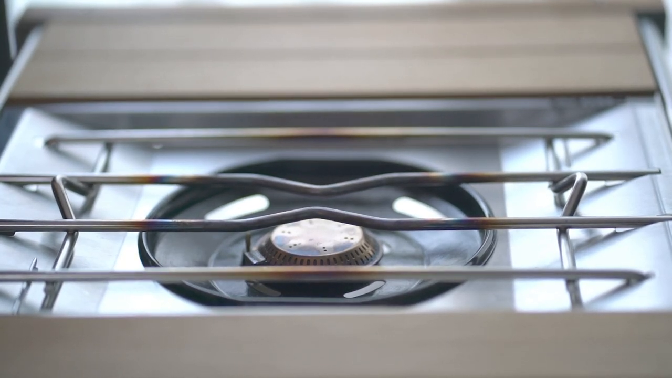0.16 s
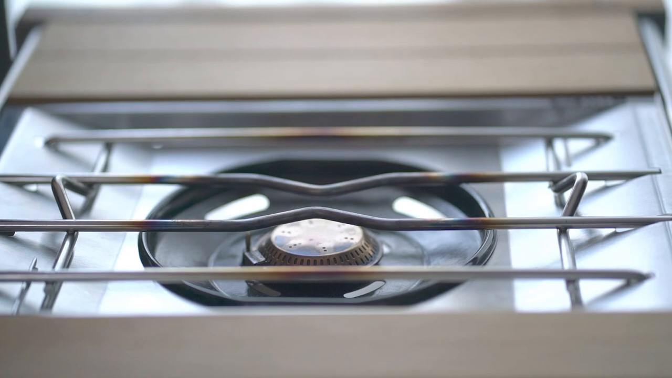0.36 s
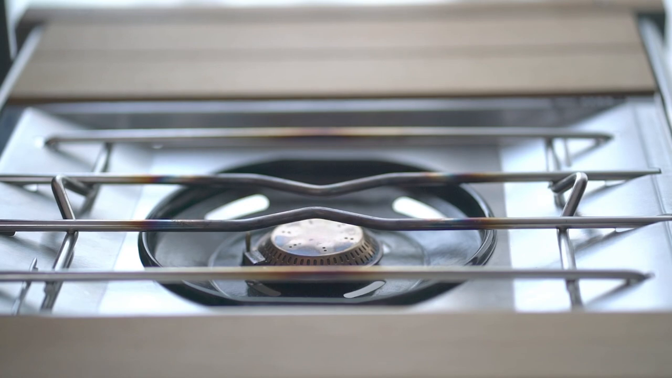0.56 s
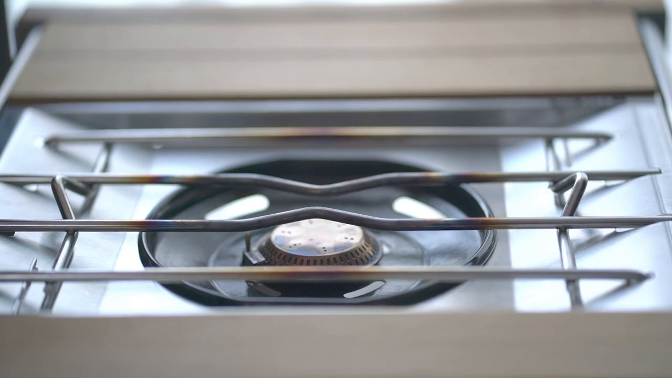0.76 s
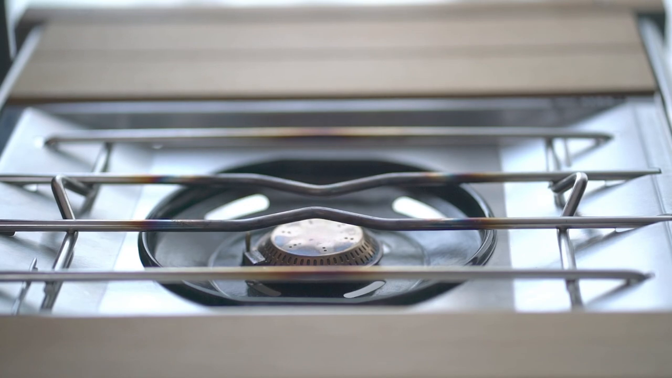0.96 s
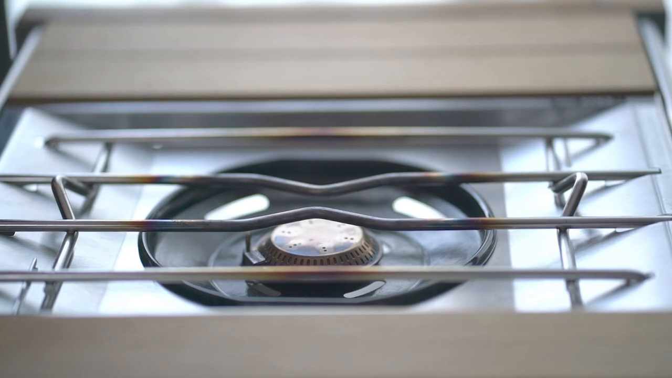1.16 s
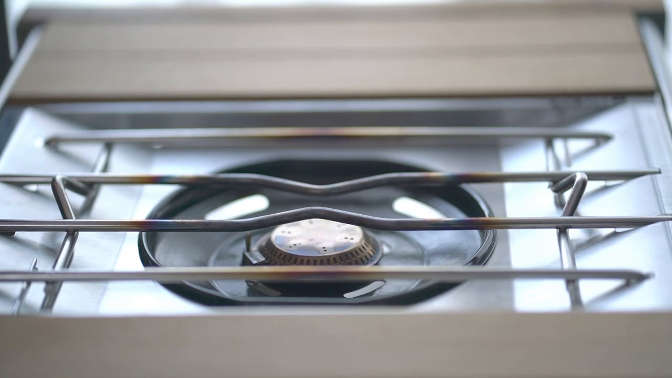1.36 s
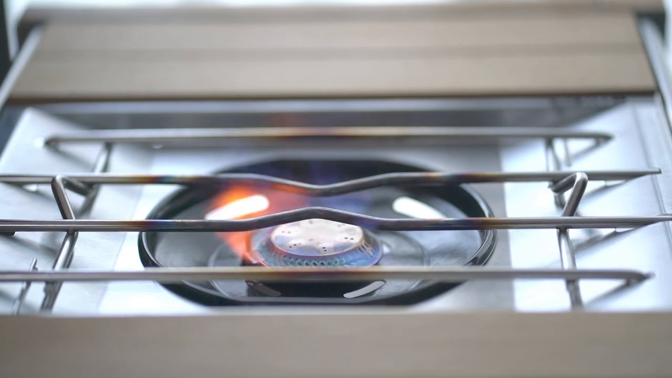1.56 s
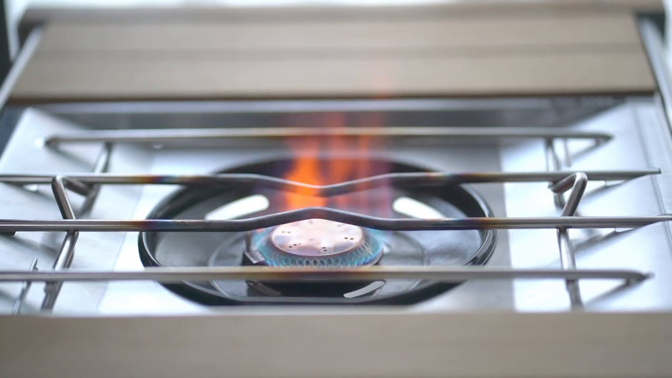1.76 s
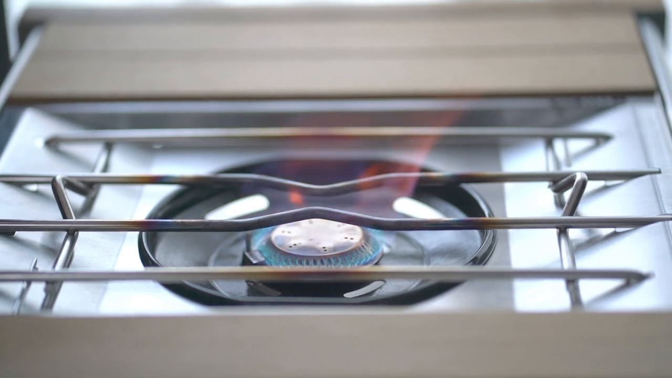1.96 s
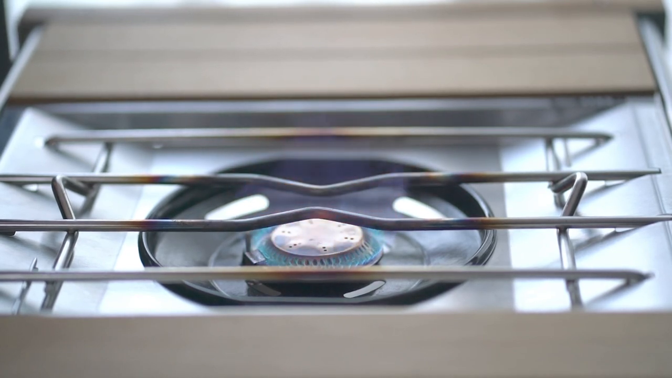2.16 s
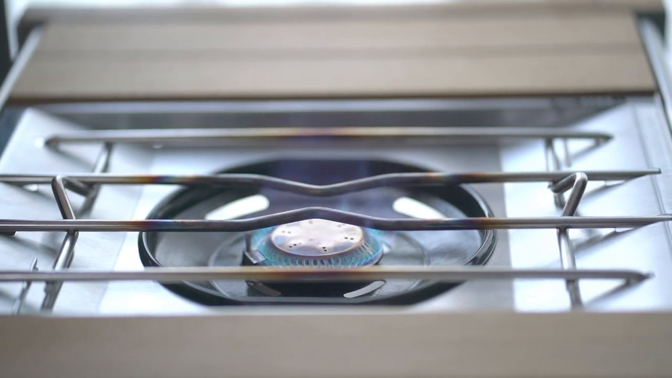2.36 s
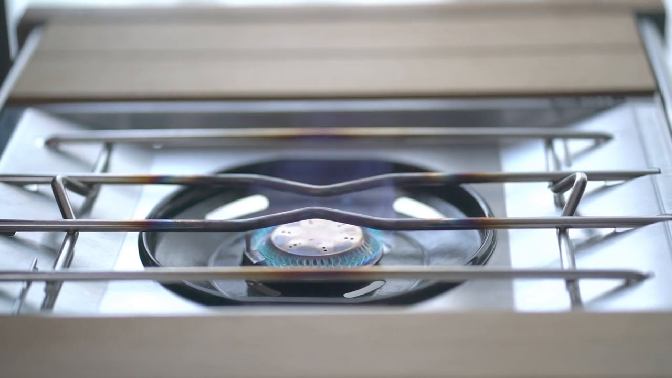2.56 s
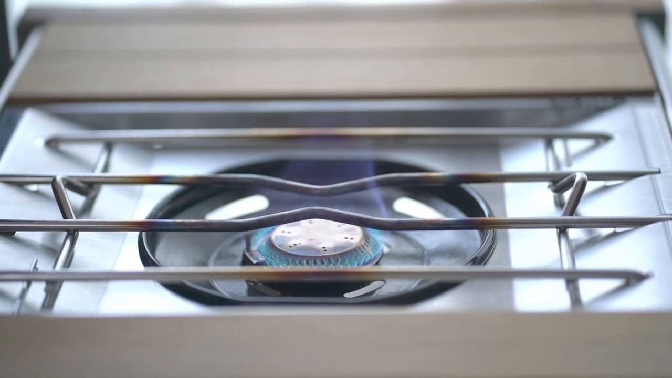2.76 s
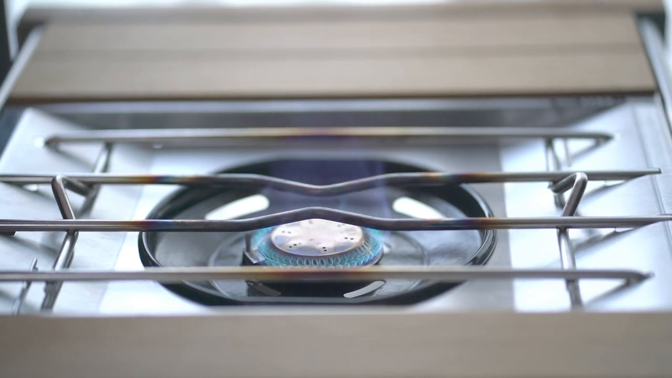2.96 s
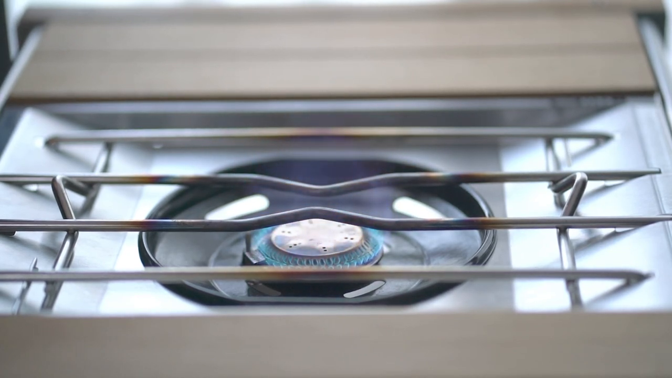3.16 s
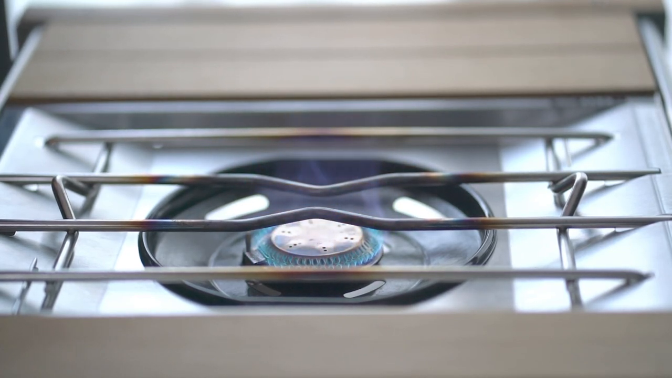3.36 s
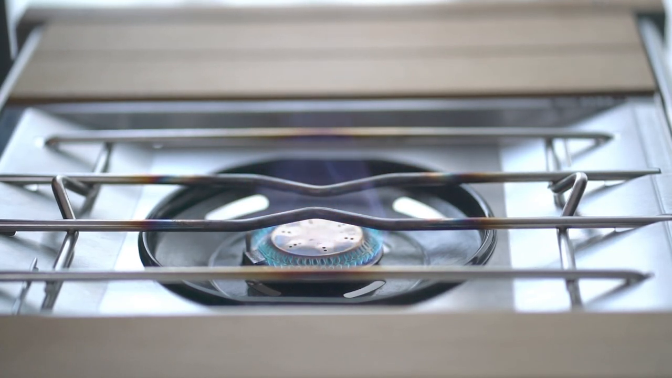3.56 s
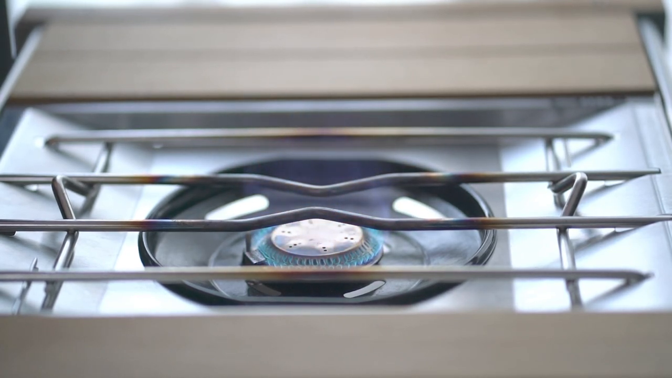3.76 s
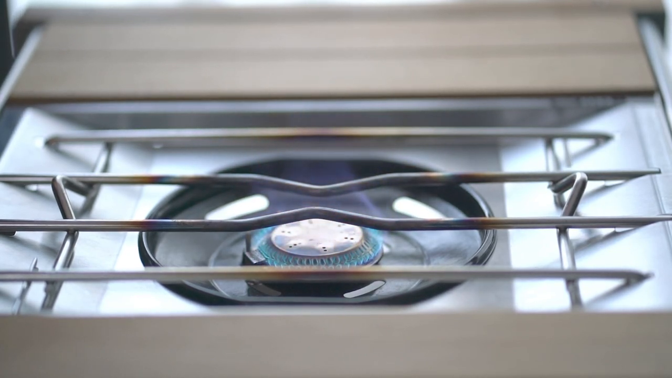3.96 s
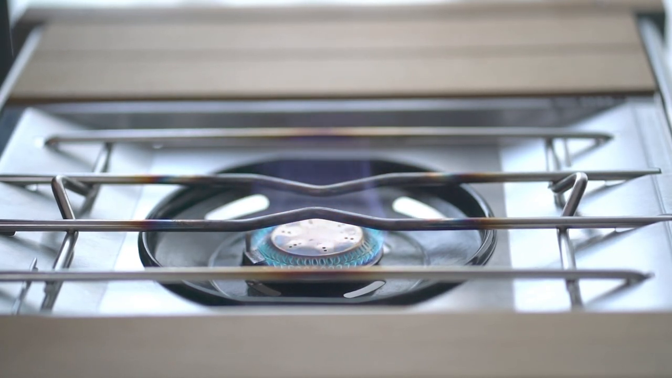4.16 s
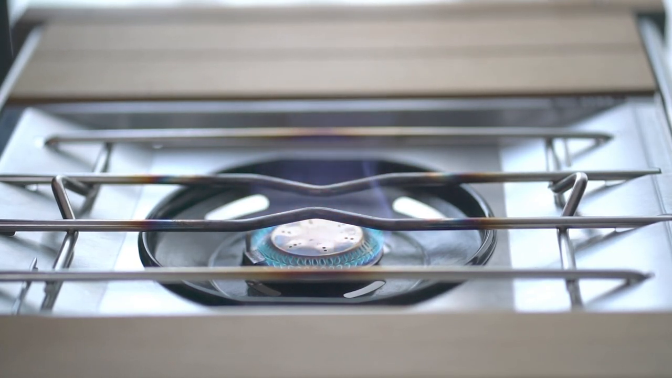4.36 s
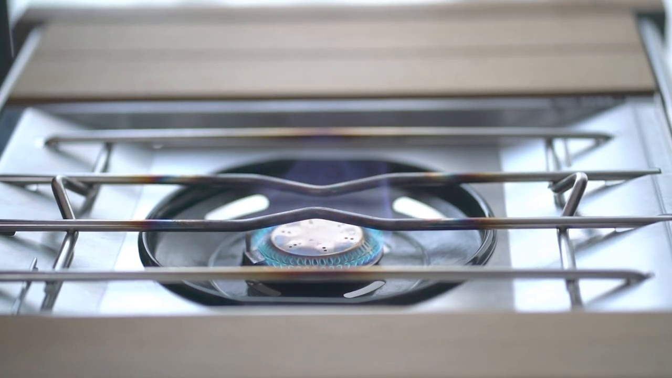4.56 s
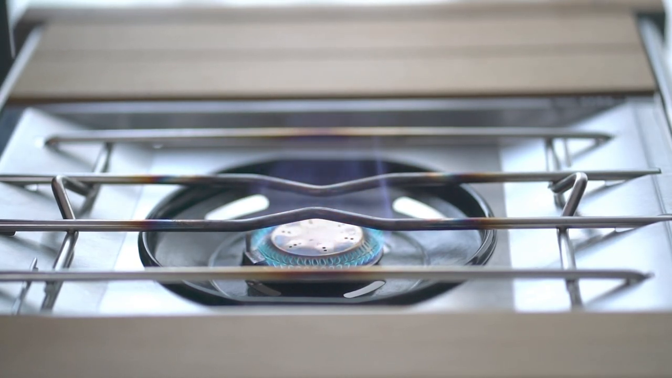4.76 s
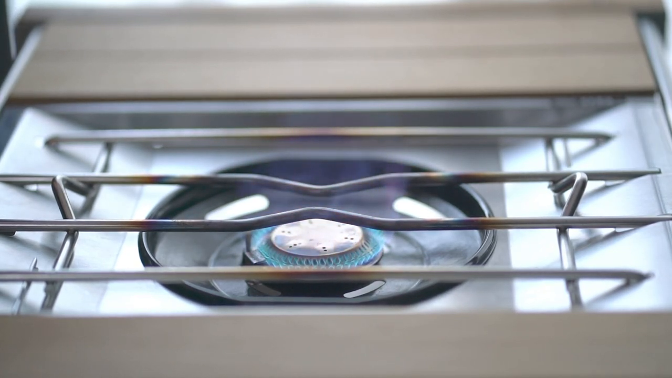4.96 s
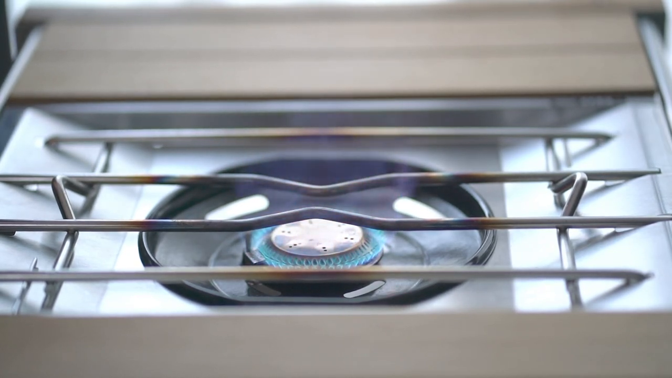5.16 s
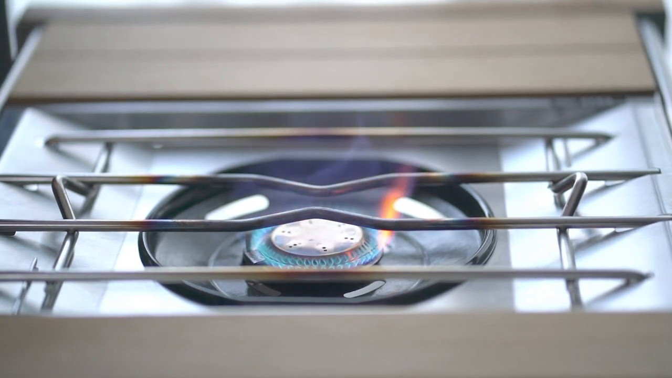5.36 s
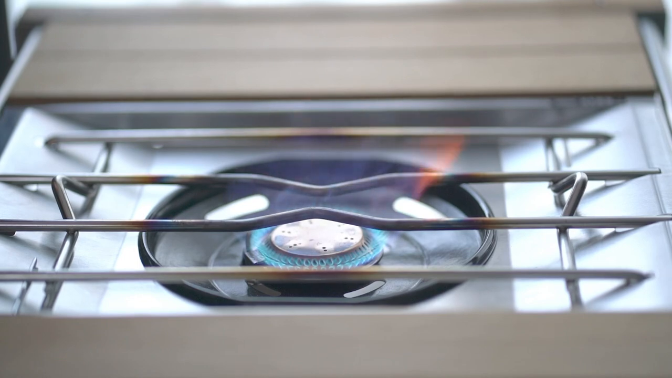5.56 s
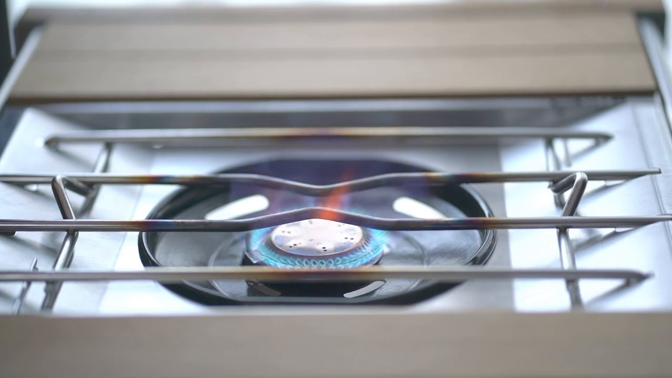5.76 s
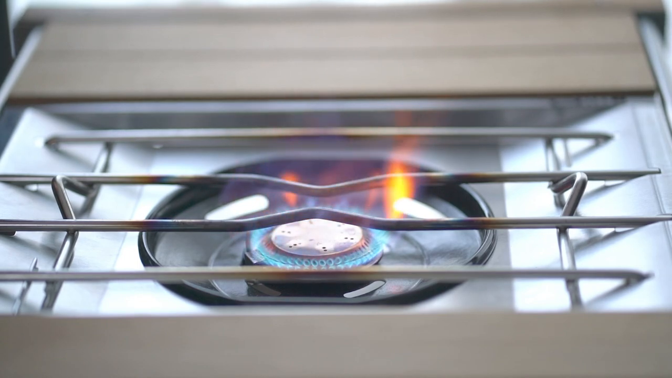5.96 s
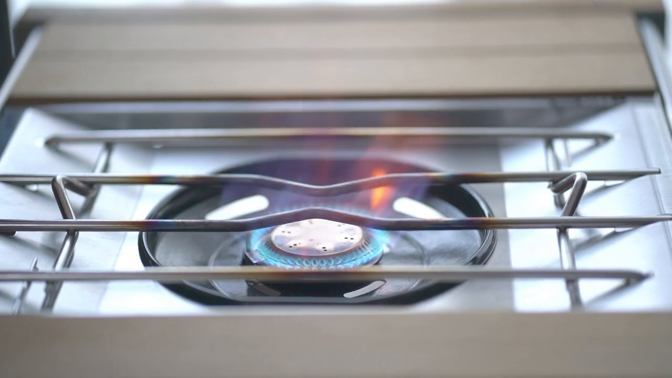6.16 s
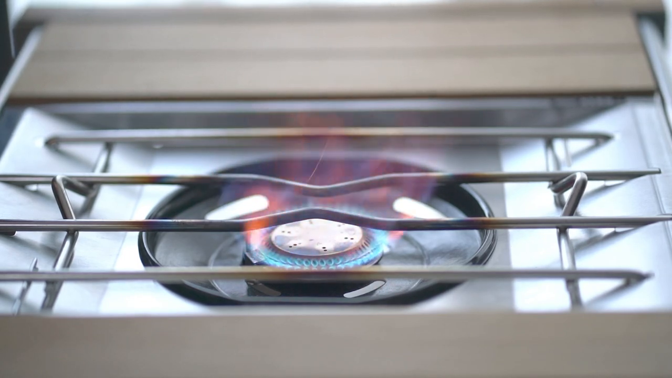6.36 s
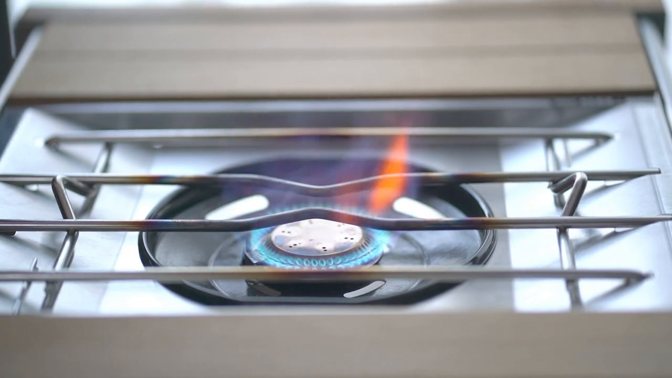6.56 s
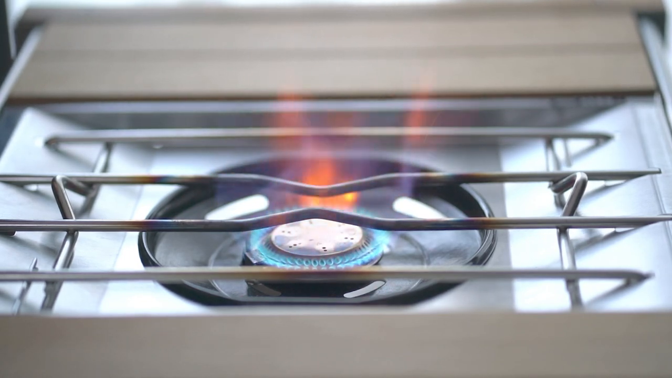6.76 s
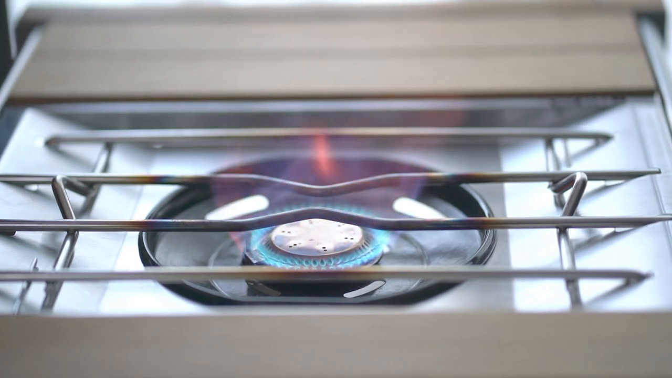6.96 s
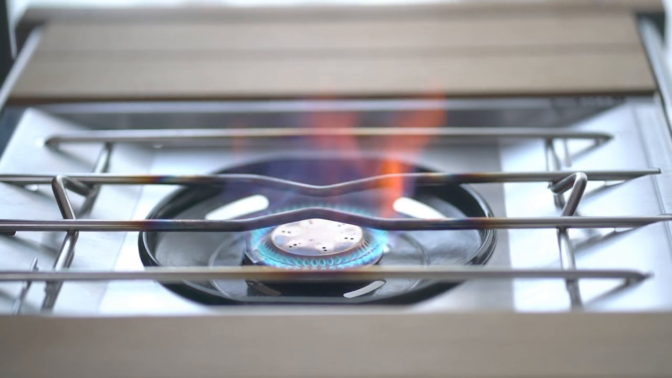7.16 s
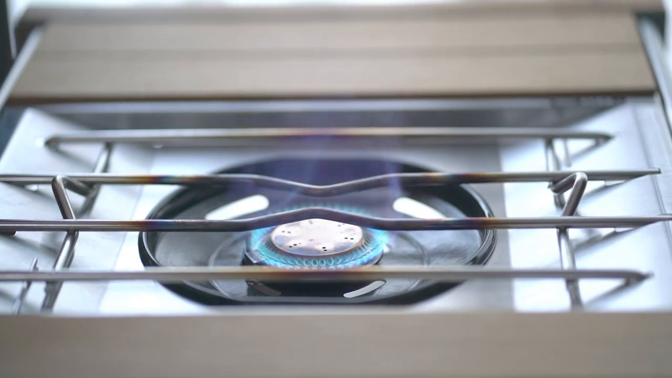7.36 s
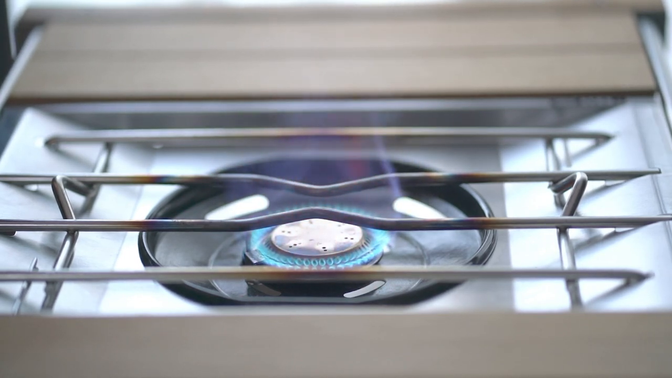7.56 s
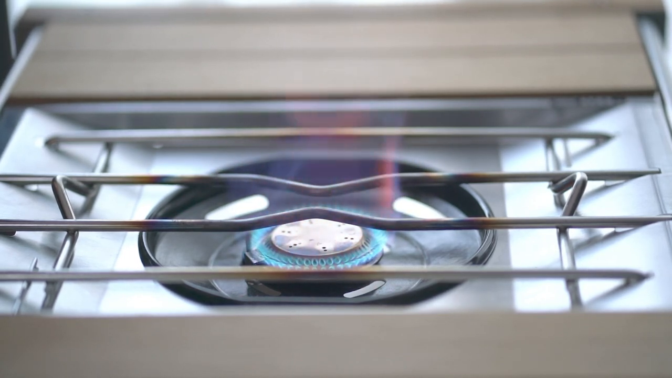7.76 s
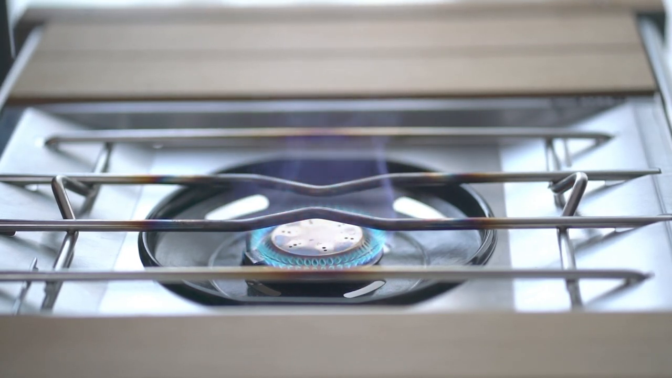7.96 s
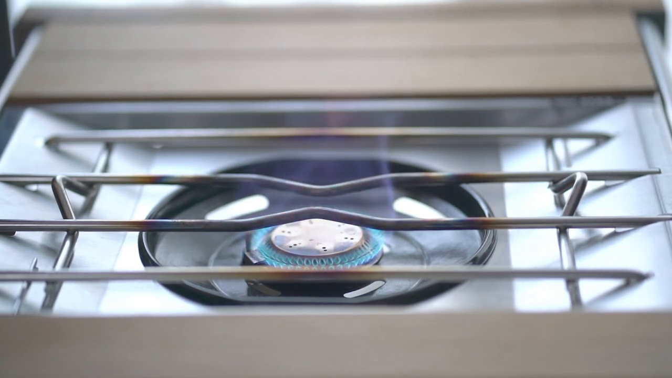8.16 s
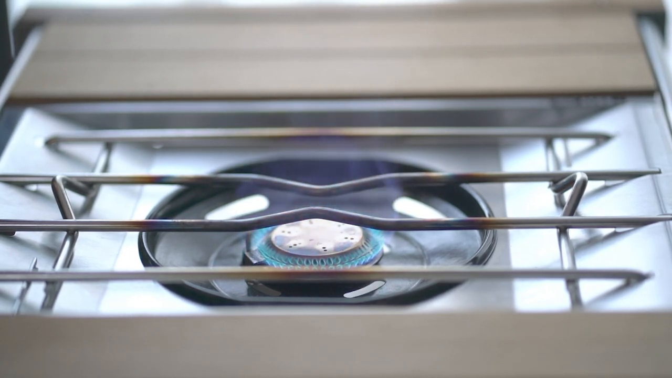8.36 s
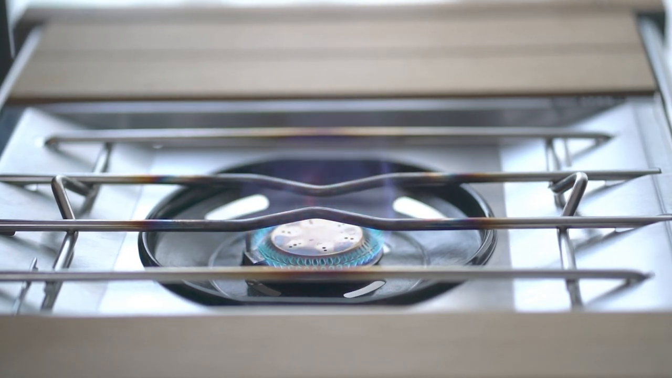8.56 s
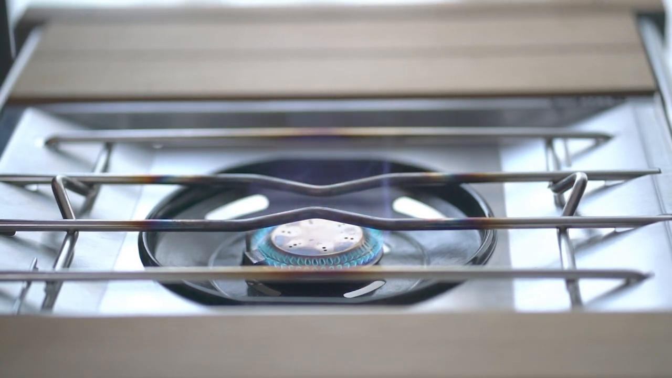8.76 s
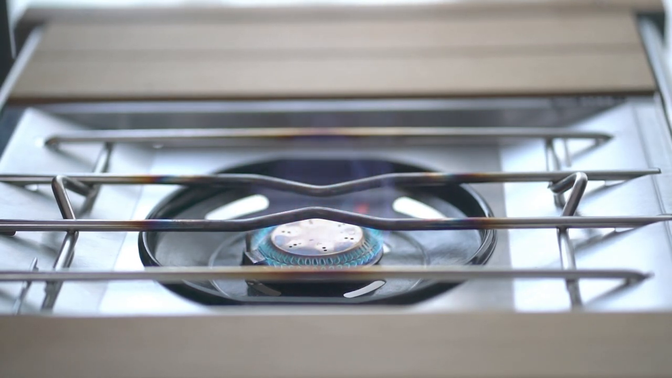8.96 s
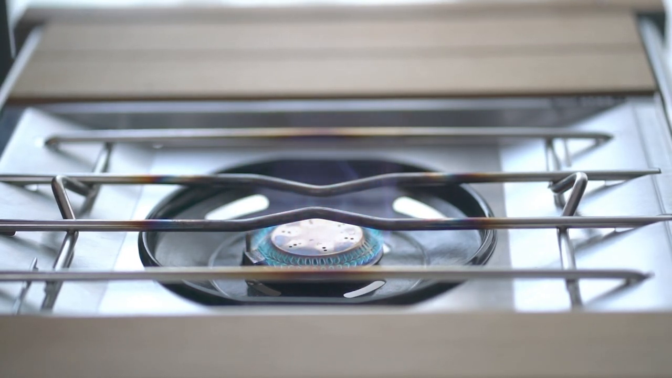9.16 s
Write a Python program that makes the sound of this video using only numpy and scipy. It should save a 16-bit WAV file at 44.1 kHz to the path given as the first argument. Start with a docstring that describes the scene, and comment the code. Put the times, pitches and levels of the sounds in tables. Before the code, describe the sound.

A gas camping stove hisses, its igniter snaps and clacks, and the flame catches, swelling to a soft roar before easing off outdoors.

```python
"""A camping gas stove burns close by, outdoors. As the valve opens, the turbulent jet hisses and excites
the resonances of the mixing tube, one group of them as a whistle. The piezo igniter snaps and springs
back, setting the steel case ringing. The flame catches with a puff, is turned down, up to a soft roar
and down again, over a steady far rush and a few faint bird calls."""
import sys
import numpy as np
from scipy import signal
from scipy.fft import rfft, irfft, next_fast_len
from scipy.io import wavfile
from scipy.ndimage import map_coordinates

SR = 44100
rng = np.random.default_rng(int(sys.argv[2]) if len(sys.argv) > 2 else 0)


def to_wav(s):
    """Save 16-bit WAV."""
    ch = np.atleast_2d(s).T  # columns
    pcm = np.round(np.clip(ch, -1, 1) * 32767)  # PCM
    wavfile.write(sys.argv[1], SR, pcm.astype(np.int16))


N = 406602


def amp(db):
    """Amplitude ratio of a level in decibels."""
    return 10 ** (np.asarray(db) / 20)

def unit(x):
    """Normalisation to rms 1."""
    return x / np.sqrt(np.mean(x ** 2) + 1e-20)

def along(points, hz):
    """Interpolation of (f/Hz, value) points on a logarithmic frequency axis."""
    f, v = np.transpose(points)
    return np.interp(np.log(hz + 1), np.log(f + 1), v)

def wobble(rate):
    """Smooth random modulation: a spline through `rate` Gaussian knots a second."""
    knots = rng.standard_normal(int(N * rate / SR) + 4)
    return map_coordinates(knots, [np.arange(N) * rate / SR])

def since(onset_s):
    """Time in seconds since an onset, zero before it."""
    return np.maximum(np.arange(N) / SR - onset_s, 0)

def filtered(x, response):
    """Linear filtering: the spectrum of x is multiplied by a frequency response."""
    size = x.shape[-1]
    padded = next_fast_len(size + 8192)
    return irfft(rfft(x, padded) * response(np.fft.rfftfreq(padded, 1 / SR)), padded)[..., :size]

def stereo(mid, side):
    """Sum and difference: left and right from mid and side."""
    return np.array([mid + side, mid - side])

def rush(spectrum, width, size=N):
    """Shaped stereo noise of rms 1, given its relative spectrum and its side level against mid."""
    colour = lambda hz: amp(along(spectrum, hz)) * np.array([np.ones_like(hz), amp(along(width, hz))])
    return unit(stereo(*filtered(rng.standard_normal((2, size)), colour)))

def diffuse_echoes(size, t60):
    """Impulse response of a diffuse field: two channels of decaying noise, each of unit energy."""
    t = np.arange(size) / SR
    echoes = rng.standard_normal((2, size)) * amp(-60 * t / t60)
    return echoes / np.linalg.norm(echoes, axis=1, keepdims=True)


# gas flow as the valve is turned: t/s, level/dB
VALVE_FLOW = [(0.0, -71.5), (0.54, -61), (0.77, -57), (1.43, -50.5), (2.67, -52), (3.18, -56), (3.7, -58),
              (4.19, -55), (4.41, -53), (4.75, -51), (5.06, -48), (6.09, -41.5), (6.65, -40), (7.65, -42.5),
              (7.96, -46), (8.32, -47), (8.7, -53), (9.22, -57.5)]
WIDE_OPEN_DB = -40.5

def flow():
    """Throttling: the valve sets the gas flow, in dB relative to wide open."""
    times, level_db = np.transpose(VALVE_FLOW)
    return np.interp(np.arange(N) / SR, times, level_db) - WIDE_OPEN_DB

def tray(x):
    """Interference: reflections between steel tray and lid comb the sound, the treble least; rms 1."""
    reflection_db = [(2500, -5), (5500, -7), (9000, -9), (15000, -9)]
    echoes = filtered(diffuse_echoes(SR // 8, t60=0.22), lambda hz: amp(along(reflection_db, hz)))
    mid_side = stereo(*x)
    reflected = signal.fftconvolve(mid_side, echoes, axes=1)[:, :N]
    return unit(stereo(*(mid_side + reflected)))

def tube_ring(modes, flow_db, drift_db=1.5):
    """Forced resonance: turbulence drives each mode, which drifts and grows as a power of the flow."""
    ring, at_full_flow = np.zeros((2, 2, N))
    for centre_hz, width_hz, db, side_db, power in modes:
        band = lambda hz: 1 / (1 + 1j * (hz - centre_hz) / (0.48 * width_hz)) ** 2
        mid, side = filtered(rng.standard_normal((2, N)), band)
        mode = amp(db + drift_db * wobble(8)) * stereo(mid, amp(side_db) * side)
        at_full_flow += mode
        ring += amp(flow_db) ** power * mode
    return tray(ring) * ring.std() / at_full_flow.std()


# modes of mixing tube and burner head: f/Hz, bandwidth/Hz, relative level/dB, side/dB, flow exponent
TUBE_MODES = [(2062, 150, -11.5, -6, 1.1), (2333, 180, -4.5, -7, 1.01), (2465, 110, -2.7, -5, 0.75),
              (2549, 107, 3.2, -9, 1.26), (5160, 90, -1, -6, 0.71), (5296, 86, -3, 5, 0.92),
              (5437, 106, -3, 1.5, 0.69), (5583, 67, -1.5, -1, 0.77), (7680, 100, -2, -5, 1),
              (7873, 160, -0.1, -3, 0.86), (8100, 190, -2, 0, 0.91), (8203, 44, -1, -8, 1.15),
              (9600, 310, -10.5, 2, 1.1), (9630, 110, -5, -3, 1.25), (12900, 120, -15.2, -4, 0.86)]
# noise spectra of the jet and of the unlit ports: f/Hz, relative level/dB
JET_SPECTRUM = [(200, -30), (900, -6), (2000, -2), (3100, -2), (4200, 0.5), (5000, -0.5), (5800, 1),
                (6500, -6.5), (7200, -3), (8500, 0.5), (10000, 0), (11500, 0), (14000, -5.5), (15800, -4)]
PORT_SPECTRUM = [(1500, -17), (2700, -46), (3150, 8.5), (3600, 6), (4100, -54), (4700, -3), (6200, -10),
                 (7400, -3), (7830, 11.5), (8300, -15), (9400, 6.5), (11000, -32), (15800, -30)]
# stereo width of both: f/Hz, side level re mid/dB
JET_WIDTH = [(1000, -41), (2400, 3.5), (3100, -6.5), (4500, -4), (5500, -2), (6800, -7), (8500, -14),
             (10200, -3.5), (11000, -9.5), (13000, -4), (15500, -1)]
HISS_DB, RING_DB, PORT_DB = -35, -37, -37
LIGHT_S, PORT_FADE_DB_PER_S = 1.597, 90

def gas():
    """Turbulent jet noise: a broad hiss excites the tube; the ports hiss too until the gas is lit."""
    flow_db = flow()
    hiss = amp(HISS_DB + flow_db) * tray(rush(JET_SPECTRUM, JET_WIDTH))
    ring = amp(RING_DB) * tube_ring(TUBE_MODES, flow_db)
    ports = amp(PORT_DB + flow_db - PORT_FADE_DB_PER_S * since(LIGHT_S)) * rush(PORT_SPECTRUM, JET_WIDTH)
    sputter_db = 0.51 * wobble(14) + 0.44 * wobble(50)
    return amp(sputter_db) * (hiss + ring + whistle() + ports)


# modes of the whistle: f/Hz, bandwidth/Hz, relative level/dB, side/dB, flow exponent
WHISTLE_RESONANCES = [(3712, 103, -3.2, -3, 0.51), (3917, 110, 1.5, -12, 0.92), (4023, 170, -0.5, -21, 1)]
# its brief spurts: t/s, duration/s, level rise/dB
WHISTLE_SPURTS = [(4.92, .18, 6), (5.193, .16, 4), (7.42, .08, 6), (7.647, .08, 8), (7.83, .1, 2),
                  (8.043, 0.11, 5)]
WHISTLE_DB, KNEE_FLOW_DB = -51.5, -7.5

def whistle():
    """Saturating resonance: the whistle grows with the flow up to a knee, wavers and at times spurts."""
    t = np.arange(N) / SR
    spurt_db = sum(db * np.exp(-(2 * (t - s) / length) ** 2) for s, length, db in WHISTLE_SPURTS)
    drive_db = np.minimum(flow() - KNEE_FLOW_DB, 0)
    waver_db = 1.5 * wobble(11)
    return amp(WHISTLE_DB + waver_db + spurt_db) * tube_ring(WHISTLE_RESONANCES, drive_db)


# spectrum of the far rush: f/Hz, relative level/dB
AMBIENT_SPECTRUM = [(25, -47), (55, -39), (100, -30), (130, -16.5), (165, -22.5), (220, -8), (450, -7),
                    (800, -0.5), (1200, -4), (2000, -9.5), (4000, -15.5), (15000, -33)]
# stereo width of sound in the open air: f/Hz, side level re mid/dB
AIR_WIDTH = [(100, -34), (200, -36), (350, -18), (700, -12), (1400, -5.5), (3000, -3.5)]

def outdoors():
    """Ambient noise: a far, nearly stationary rush in the open air."""
    return amp(-50.5 + 0.12 * wobble(2.76)) * rush(AMBIENT_SPECTRUM, AIR_WIDTH)


# far bird calls: t/s, duration/s, start f/Hz, end f/Hz, level/dB
BIRD_CALLS = [(.2, 0.049, 1635, 1595, -56), (3.138, 0.044, 1620, 1614, -55),
              (3.193, 0.077, 1623, 1526, -53), (3.86, 0.096, 1770, 1870, -57),
              (4.05, 0.075, 1780, 1585, -57)]

def birds():
    """Reverberation: echoes from the trees blur short gliding tones from far off."""
    calls = np.zeros(N)
    for s, length, start_hz, end_hz, db in BIRD_CALLS:
        progress = np.linspace(0, 1, round(length * SR))
        phase = 2 * np.pi * np.cumsum(start_hz + (end_hz - start_hz) * progress) / SR
        calls[round(s * SR):][:len(phase)] += amp(db) * np.sin(np.pi * progress) * np.sin(phase)
    trees = diffuse_echoes(SR // 2, t60=0.5)
    return calls + amp(2.0) * signal.fftconvolve(calls[None], trees, axes=1)[:, :N]


# modes of the steel case: f/Hz, relative level/dB, T60/s
CASE_MODES = [(1220, -3, 0.14), (1570, -3, 0.27), (1660, -2, 0.22), (1686, 2, 0.25), (1830, -10, .27),
              (1980, -16, 0.34), (2160, -3, .27), (2292, -1, 0.35), (3280, 0, 0.32), (4048, -1, 0.22),
              (4300, -3, .26), (4350, 0, 0.24), (4390, 1, 0.34), (4538, -4, .36), (4820, -6, 0.36),
              (4800, -11, 0.36), (4943, -6, 0.37), (5600, -14, .31), (5860, -11, 0.43), (7200, -17, .34),
              (7700, -10, 0.15), (8533, -18, .2), (9200, -12, .26), (9625, -2, 0.28)]
# spectra of the sheet steel's clatter and of a blow's first dull crack: f/Hz, relative level/dB
CLATTER_SPECTRUM = [(40, -38), (90, -20), (200, -30), (400, -10), (850, -16), (1250, -1.5), (1700, 5),
                    (2200, -1.5), (2700, -8), (4400, -0.5), (6300, -5.5), (7700, -3.5), (8800, -10),
                    (10000, -7), (11000, -12.5), (15800, -17)]
CRACK_SPECTRUM = [(500, -31), (850, -9), (1300, 3), (2100, 0), (2900, -21), (4400, -4), (9000, -25)]

def snap(db, tilt_db, ring_db, crack_db):
    """Impact excitation: a dull crack, then the case's dense clatter and modes in free decay."""
    t = np.arange(SR * 3 // 4) / SR
    hz, level_db, t60 = np.transpose(CASE_MODES)[:, :, None]
    phase = rng.uniform(0, 2 * np.pi, (2, len(CASE_MODES), 1))
    struck_db = level_db + rng.normal(0, 1, phase.shape)
    modes = amp(struck_db - 60 * t / t60) * np.sin(2 * np.pi * hz * t + phase)
    mid, side = modes.sum(axis=1)
    ring = amp(ring_db - 9.5) * stereo(mid, amp(-1) * side)
    double_decay = amp(-6.0 - 60 * t / 0.11) + amp(-2.0 + 0.42 * ring_db - 60 * t / 0.37)
    clatter_width = [(200, -29), (1500, -7), (4000, -2.0), (12000, -3)]
    clatter = rush(CLATTER_SPECTRUM, clatter_width, size=len(t)) * double_decay
    crack = rush(CRACK_SPECTRUM, AIR_WIDTH, size=len(t)) * amp(crack_db - 60 * t / 0.031)
    # the bending waves need a moment to spread over the sheet
    blow = crack * (1 - np.exp(-t / 0.00037)) + (ring + clatter) * (1 - np.exp(-t / 0.0015))
    return amp(db) * filtered(blow, lambda f: amp(tilt_db * np.log2(np.maximum(f, 500) / 3000)))


# blows on the case: t/s, level/dB, tilt/(dB per octave), ring gain/dB, crack gain/dB
CASE_BLOWS = [(1.519, -20.5, 1.5, 0, 10), (1.5314, -24.5, 2, 0.5, -11), (1.783, -37.5, 5, -8, -12),
              (7.634, -41, 5.5, -7, -6)]

def igniter():
    """Impact and rebound: the piezo hammer strikes, bounces and springs back; later hot steel ticks."""
    out = np.zeros((2, N + SR))
    for s, *strike in CASE_BLOWS:
        blow = snap(*strike)
        out[:, round(s * SR):][:, :blow.shape[1]] += blow
    return out[:, :N]


# envelope of the stove's thump: level/dB, T60/s
THUMP_ENVELOPE = (-59, .25)
# its spectrum: f/Hz, relative level/dB
THUMP_SPECTRUM = [(25, -14), (50, -5), (90, 0), (170, -6), (380, -2), (800, -14), (2000, -40)]

def jolt():
    """Momentum transfer: the hammer's first blow shakes the whole stove with a faint low thump."""
    db, t60 = THUMP_ENVELOPE
    t = since(CASE_BLOWS[0][0])
    return amp(db - 60 * t / t60) * (1 - np.exp(-t / .002)) * rush(THUMP_SPECTRUM, AIR_WIDTH)


# spectra of the flame's roar and of its low murmur: f/Hz, relative level/dB
ROAR_SPECTRUM = [(25, -41), (50, -41), (85, -8), (125, -13), (160, -16.5), (225, 5), (290, 0.5), (480, 1),
                 (800, 4), (1000, 0.5), (1400, -4.5), (2500, -8), (6000, -37)]
MURMUR_SPECTRUM = [(25, -29), (50, -31), (85, -4), (125, -7), (160, -4.5), (230, -2), (400, -0.5),
                   (1500, -9), (4000, -42)]
ROAR_DB, ROAR_EXPONENT, MURMUR_DB = -45.5, 1.23, -65.5
PUFF_DB, PUFF_T60_S, SPREAD_S = -42, 0.16, 0.006

def flame():
    """Combustion noise: gathered gas burns off in a puff; a roar follows the flow over a murmur."""
    age = since(LIGHT_S)
    lit = 1 - np.exp(-(age / SPREAD_S) ** 2)  # the flame spreads round the ports
    puff = amp(PUFF_DB - 60 * age / PUFF_T60_S)
    flutter_db = 0.4 * wobble(6.3) + 0.27 * wobble(28)
    roar = amp(flow()) ** ROAR_EXPONENT * amp(ROAR_DB + flutter_db)
    murmur = amp(MURMUR_DB) * rush(MURMUR_SPECTRUM, AIR_WIDTH)
    return lit * ((puff + roar) * rush(ROAR_SPECTRUM, AIR_WIDTH) + murmur)


# the lever's impact on its stop: t/s, level/dB, T60/s
LEVER_IMPACT = (1.7812, -27, 0.11)
# spectrum of its clack: f/Hz, relative level/dB
CLACK_SPECTRUM = [(500, -33), (950, -19), (1200, -9), (1550, 4), (2000, -10), (2600, -11), (3300, -3),
                  (4000, -9), (4700, -25), (7000, -24), (9000, -7), (10500, -20), (15800, -30)]

def lever():
    """Restoring force: the spring throws the lever back on its stop with a short hollow clack."""
    s, db, t60 = LEVER_IMPACT
    t = since(s)
    return amp(db - 60 * t / t60) * (1 - np.exp(-t / 0.00055)) * rush(CLACK_SPECTRUM, AIR_WIDTH)


def scene():
    """Superposition: level differences set the gas a little right of centre, the igniter a little left."""
    hissing = gas() * amp([[-.3], [.3]])
    impacts = (igniter() + jolt() + lever()) * amp([[.2], [-.2]])
    return hissing + impacts + flame() + outdoors() + birds()


CUTOFF_HZ = 15760

def record(dry):
    """Band limiting: an ideal low-pass filter passes nothing above its cutoff."""
    return filtered(dry, lambda hz: hz < CUTOFF_HZ)


dry = scene()
out = record(dry)
to_wav(out)
```